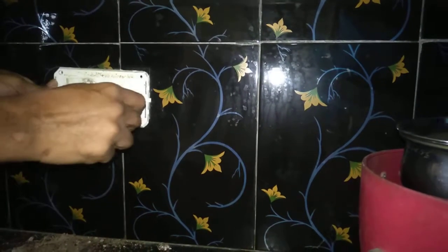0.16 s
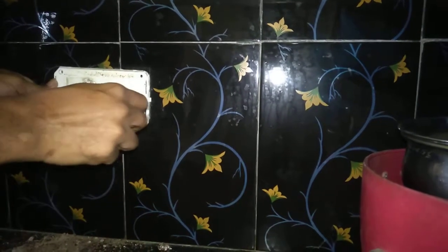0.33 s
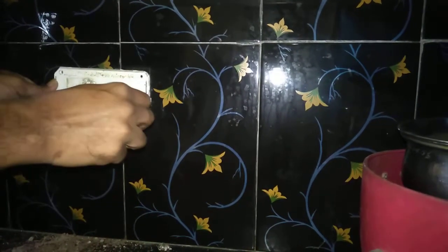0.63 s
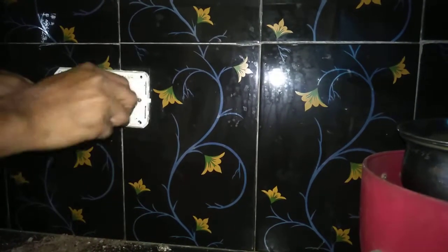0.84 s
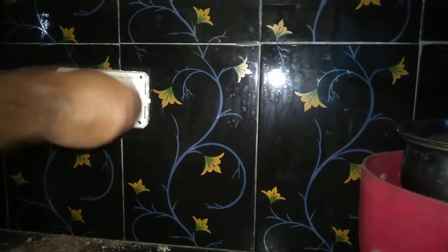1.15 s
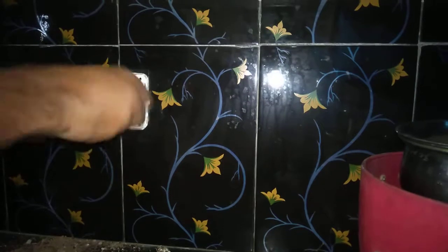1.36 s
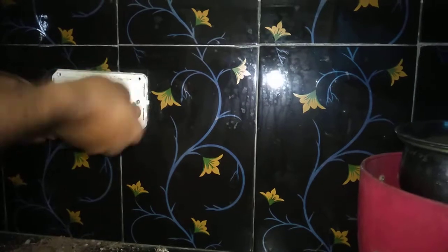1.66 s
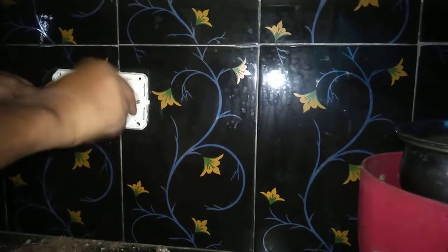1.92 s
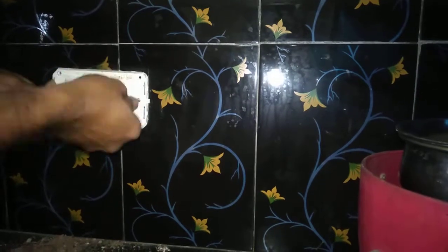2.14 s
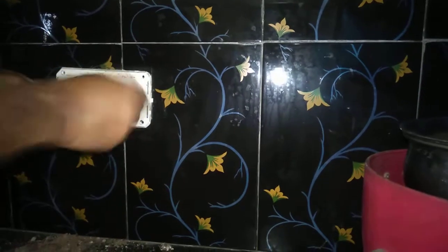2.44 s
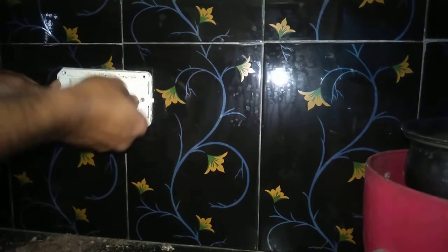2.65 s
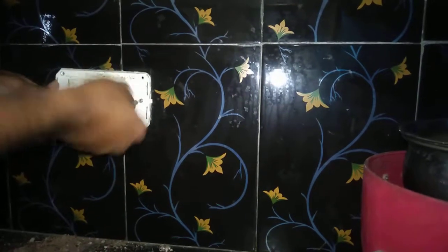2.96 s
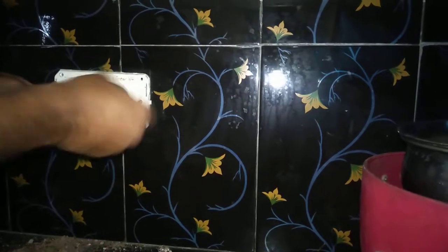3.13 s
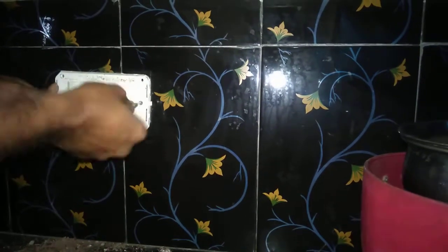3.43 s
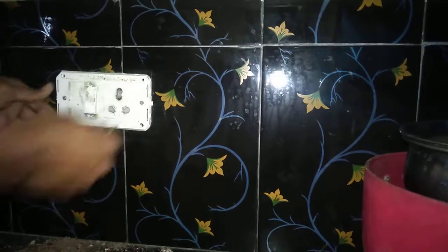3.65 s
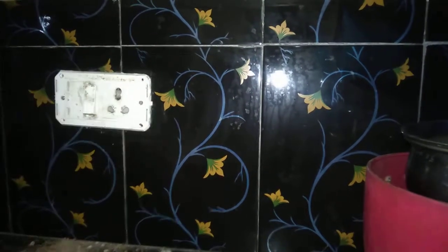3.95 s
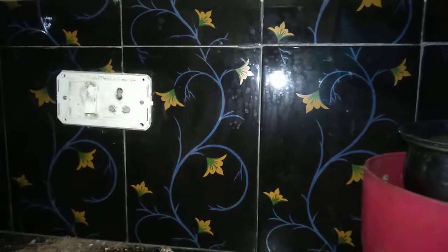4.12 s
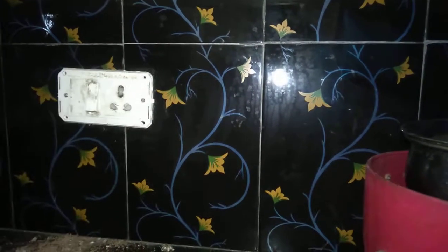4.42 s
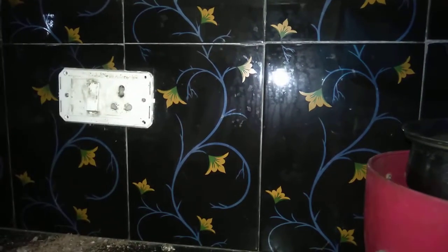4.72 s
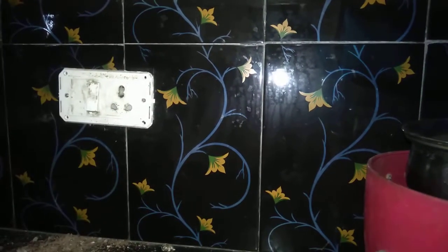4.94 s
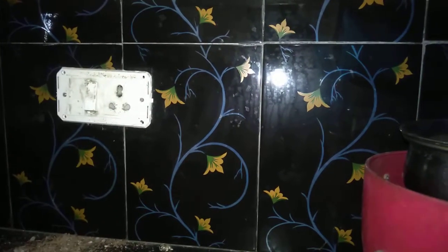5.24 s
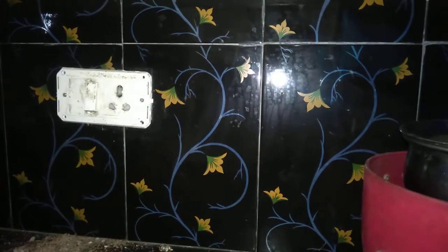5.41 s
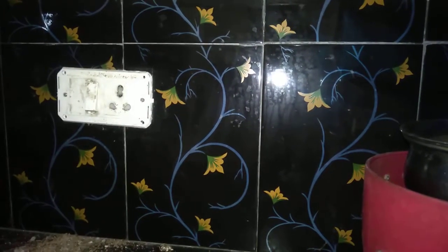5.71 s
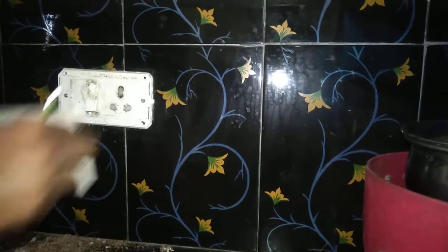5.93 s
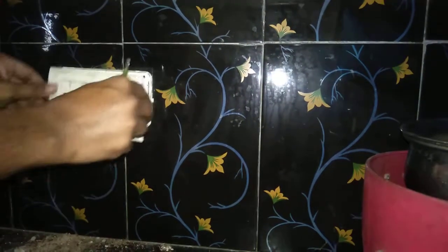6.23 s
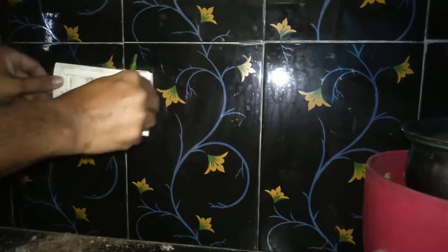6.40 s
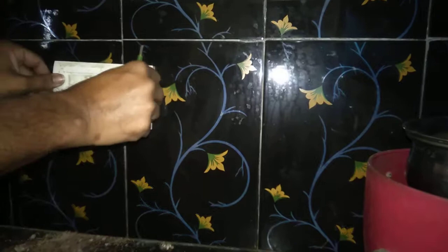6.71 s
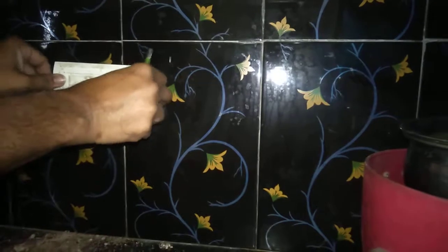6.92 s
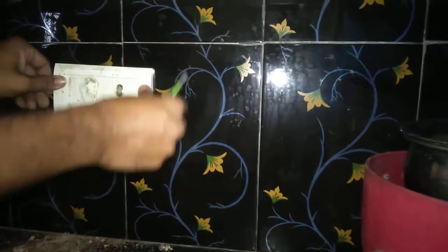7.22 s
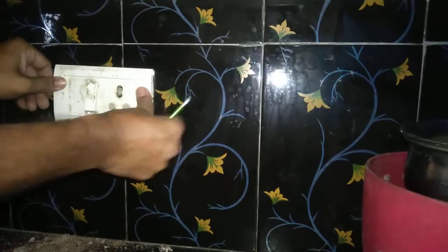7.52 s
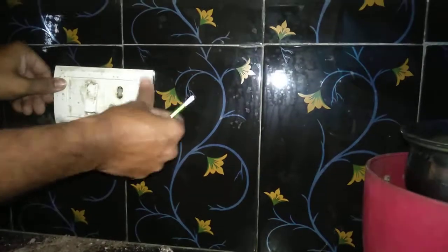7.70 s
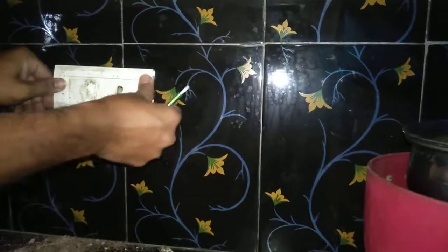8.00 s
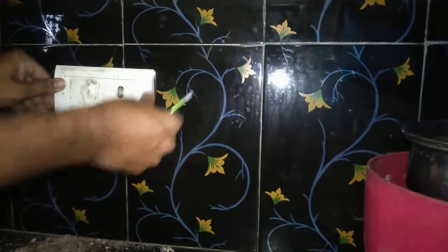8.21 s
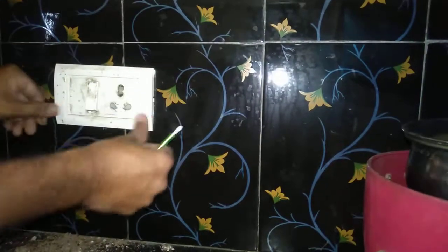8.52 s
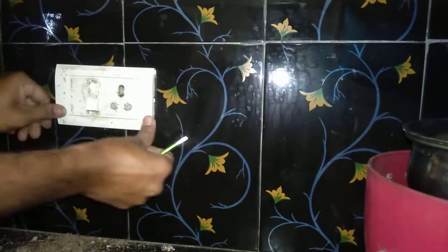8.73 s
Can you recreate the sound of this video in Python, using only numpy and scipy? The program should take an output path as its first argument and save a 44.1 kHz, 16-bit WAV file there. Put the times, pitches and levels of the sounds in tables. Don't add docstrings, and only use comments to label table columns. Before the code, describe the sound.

Close plastic clacks and rattles as a tool slips on a screw, then a wall-plate cover snaps and slams home in a hard tiled kitchen.

```python
import sys
import numpy as np
from scipy import signal
from scipy.fft import rfft, irfft, next_fast_len
from scipy.io import wavfile
from scipy.ndimage import uniform_filter1d

SR = 44100
rng = np.random.default_rng(int(sys.argv[2]) if len(sys.argv) > 2 else 0)


def generate_wav(sig):
    pcm = np.round(np.clip(np.atleast_2d(sig).T, -1, 1) * 32767).astype(np.int16)
    wavfile.write(sys.argv[1], SR, pcm)


def amplitude_ratio(level_db):
    exponent = np.asarray(level_db, float) / 20
    return 10 ** exponent


N = 390725


def evened(x):
    return x / np.sqrt(np.mean(x ** 2) + 1e-20)


def smoothed_noise(size, passes=1):
    x = rng.standard_normal(N)
    for _ in range(passes):
        x = uniform_filter1d(x, size)
    return evened(x)


def read_spectrum(points, hz):
    f, value = np.transpose(points)
    return np.interp(np.log(hz + 1), np.log(f + 1), value)


def add(mix, start_s, sound):
    part = mix[round(start_s * SR):][:len(sound)]
    part += sound[:len(part)]


def coloured_noise(points):
    size = next_fast_len(N)
    gain = amplitude_ratio(read_spectrum(points, np.fft.rfftfreq(size, 1 / SR)))
    return evened(irfft(rfft(rng.standard_normal(size)) * gain, size)[:N])


def causal(points, size=4096):
    hz = abs(np.fft.fftfreq(size, 1 / SR))
    log_gain = np.log(amplitude_ratio(read_spectrum(points, hz)))
    return np.fft.ifft(np.exp(np.conj(signal.hilbert(log_gain)))).real[:size // 2]


def resonant_noise(hz, width_hz):
    turn = np.exp(2j * np.pi * hz * np.arange(N) / SR)
    r = np.exp(-np.pi * width_hz / SR)
    slow = rng.standard_normal(N) / turn
    for _ in range(2):
        slow = signal.lfilter([1 - r], [1, -r], slow)
    return evened((turn * slow).real)


# f/Hz, level/dB per Hz
HISS_SPECTRUM = [(15, -6), (60, -16), (114, -13.5), (150, -10), (175, -26), (250, -33.5), (320, -30.5),
                 (700, -32.5), (2200, -36.5), (2800, -41.5), (11000, -43), (15700, -39), (15950, -66)]


def microphone_hiss():
    return amplitude_ratio(-63.5) * coloured_noise(HISS_SPECTRUM)


HUM_HZ, HUM_REST_DB = 142.6, -70.5
SWELL_DROP_DB, BOOM_RISE_S = -17, 0.0081
# t/s, peak level/dB, half length/s
SWELLS = [(0.16, -63, 0.17), (0.423, -62, 0.046), (0.775, -57.5, 0.12), (1, -61.5, .06), (1.526, -57, .1),
          (1.754, -61.5, 0.071), (2.194, -59, 0.058), (2.434, -60.5, 0.084), (2.64, -64.5, 0.043),
          (2.968, -59, .12), (3.266, -60, 0.16), (3.704, -59, 0.17), (4.008, -68, 0.089),
          (4.25, -66.5, 0.18), (4.754, -54.5, 0.13), (5.064, -73, 0.11), (6.21, -65, 0.17),
          (6.75, -67, 0.13), (7.5, -69, 0.44), (8.363, -59.5, 0.11), (8.703, -62.5, 0.15)]
# t/s, level/dB, t60/s
BOOMS = [
    (5.361, -37.5, 0.49),
    (5.62, -41, 0.56),
]
# f/Hz, width/Hz, level/dB
AIR_MODES = [(95.6, 15, -70.5), (297.5, 18, -82)]
# t/s, level/dB
RUMBLE = [(0.0, -71), (1.4, -71), (2.22, -61), (3.23, -70), (3.55, -66), (3.85, -75), (4.22, -71.5),
          (6.12, -77.5), (6.81, -69), (7.2, -79), (8.12, -57.5), (8.31, -60.5), (8.86, -61.5)]


def hum():
    t = np.arange(N) / SR
    pitch_hz = HUM_HZ + 3.43 * smoothed_noise(4000, passes=2)
    tone = np.sqrt(2) * np.sin(2 * np.pi * np.cumsum(pitch_hz) / SR)
    slow = t[::64]
    level = np.zeros(len(slow))
    for s, db, half_s in SWELLS:
        level += amplitude_ratio(db + SWELL_DROP_DB * ((slow - s) / half_s) ** 2)
    for s, db, t60 in BOOMS:
        since = np.maximum(slow - s, 0)
        level += amplitude_ratio(db - 60 * since / t60) * (1 - np.exp(-since / BOOM_RISE_S)) ** 2
    rest = amplitude_ratio(HUM_REST_DB) * resonant_noise(HUM_HZ, 5.2)
    modes = sum(amplitude_ratio(db) * resonant_noise(hz, width_hz) for hz, width_hz, db in AIR_MODES)
    rumble = amplitude_ratio(np.interp(t, *np.transpose(RUMBLE)) - 0.5) * resonant_noise(41, 22)
    return np.interp(t, slow, level) * tone + rest + modes + rumble


# f/Hz, t60/s
ROOM_T60 = [(150, 1), (500, 0.9), (1500, 0.57), (4000, 0.49), (7000, 0.39), (12000, 0.3), (16000, 0.37)]


def room(x):
    taps = np.zeros((2, SR))
    slots = np.arange(200, SR - 20, 20)
    shape = (2, len(slots))
    np.put_along_axis(taps, slots + rng.integers(0, 20, shape), rng.choice([-1., 1.], shape), 1)
    hz, t, z = signal.stft(taps, SR, nperseg=256)
    decay = amplitude_ratio(-60 * t / read_spectrum(ROOM_T60, hz)[:, None])
    tails = signal.istft(z * decay, SR, nperseg=256)[1]
    a, b = signal.fftconvolve(x[None], tails / np.linalg.norm(tails[0]), axes=1)[:, :N]
    shuffle_hz = 35 * smoothed_noise(300)
    turn = 2 * np.pi * np.cumsum(shuffle_hz) / SR
    return amplitude_ratio(-14) * (a * np.cos(turn) + b * np.sin(turn))


SQUEAK_HZ, SQUEAK_DB = 2706, -21
SCREW_UNTIL_S = 1.8
RUB_ENDS_DB = -25
# start t/s, firmest t/s, end t/s, hiss level/dB, body level/dB
RUBS = [(1.08, 1.14, 1.16, -68, -69), (1.522, 1.618, 1.697, -61.5, -61.5), (1.956, 2.043, 2.19, -64, -65),
        (2.42, 2.48, 2.59, -62.5, -60.5), (2.848, 2.913, 2.99, -60.5, -63),
        (3.263, 3.314, 3.39, -67.5, -66.5), (4.21, 4.245, 4.32, -56.5, -66), (4.414, 4.62, 4.76, -74, -73),
        (5.146, 5.181, 5.21, -62.5, -69.5), (5.2, 5.25, 5.31, -60.5, -68.5),
        (5.595, 5.607, 5.93, -55.5, -64), (6.7, 6.78, 6.88, -84, -66.5), (2.132, 2.128, 2.22, -88, -69.5),
        (1.09, 1.195, 1.201, -67, -68)]
# f/Hz, level/dB per Hz
SKIN_HISS = [(2060, -44.5), (3500, -10.5), (4510, -15), (5920, -1.5), (8080, -15.5), (10800, -20.5),
             (12800, -19), (15200, -5), (16200, -8), (16500, -30)]
# f/Hz, level/dB per Hz
SKIN_BODY = [(300, -20), (700, -3.5), (1500, 1.5), (2500, 2), (3500, -5.5), (5000, -31)]


def rubs():
    t = np.arange(N) / SR
    hiss_gain, body_gain = np.zeros((2, N))
    for start, firmest, end, hiss_db, body_db in RUBS:
        on = slice(round(start * SR), round(end * SR))
        slack = np.interp(t[on], np.sort([start, firmest, end]), [1, 0, 1])
        press = amplitude_ratio(RUB_ENDS_DB * slack ** 1.8)
        hiss_gain[on] += amplitude_ratio(hiss_db) * press
        body_gain[on] += amplitude_ratio(body_db) * press
    catch = smoothed_noise(500, passes=2)
    slips = amplitude_ratio(2.45 * smoothed_noise(160) - 1.5) * amplitude_ratio(1.5 * catch)
    squeak = resonant_noise(SQUEAK_HZ, 150) * (t < SCREW_UNTIL_S) * amplitude_ratio(5 * catch - 4)
    hiss = amplitude_ratio(1.0) * hiss_gain * coloured_noise(SKIN_HISS)
    body = amplitude_ratio(-2.5) * body_gain * coloured_noise(SKIN_BODY)
    return slips * (hiss + body + amplitude_ratio(21.0 + SQUEAK_DB) * body_gain * squeak)


# t/s, peak level/dB
PUSHES = [
    (5.622, -48),
    (6.892, -52),
    (6.9085, -33.5),
    (7.127, -51),
]


def pushes():
    out, t = np.zeros(N), np.arange(SR // 2) / SR
    step = (1 - np.exp(-t / .002)) ** 2 * (1 - t / .047) * np.exp(-t / .047)
    for s, db in PUSHES:
        add(out, s, amplitude_ratio(db) * step)
    return out


# t/s, peak level/dB, f/Hz, t60/s
RINGS = [(.3195, -55.5, 1310, 0.29), (.3195, -48, 1820, 0.12), (.3195, -52.5, 2720, 0.11),
         (.427, -58.5, 750, 0.14), (.656, -54.5, 635, 0.33), (.658, -48.5, 750, 0.23),
         (1.585, -61, 397, 0.21), (2.393, -49, 1310, 0.72), (2.393, -54, 1520, 0.41),
         (2.800, -59.5, 1487, 0.21), (3.445, -50.5, 472, 0.11), (3.445, -48, 732, 0.24),
         (3.467, -52, 1410, 0.26), (6.392, -48, 770, 0.099), (6.426, -51, 750, .18),
         (6.558, -50, 774, 0.29), (6.558, -50, 445, .2), (6.558, -46, 1540, 0.075), (6.667, -44, 471, .1),
         (6.690, -38.5, 754, 0.14), (6.884, -36.5, 380, 0.093), (6.910, -45.5, 714, 0.35),
         (7.127, -60, 214, .18), (7.127, -49.5, 665, 0.39), (8.566, -53, 213, 0.12),
         (1.833, -57.5, 1100, 0.44), (7.429, -51.5, 944, 0.22), (7.605, -54, 706, 0.28),
         (7.867, -51, 716, 0.25)]


def rings():
    out, t = np.zeros(N), np.arange(SR // 2) / SR
    for s, db, hz, t60 in RINGS:
        shift, turn = rng.random((2, 12, 1))
        mode_hz = hz * (1 + hz / 6000 * (shift - .5))
        cluster = np.sin(2 * np.pi * (mode_hz * t + turn)).sum(0) / np.sqrt(8)
        add(out, s, amplitude_ratio(db - 60 * t / t60) * (1 - np.exp(-t / 0.0017)) * cluster)
    return out


FIRST_DB, FIRST_S = 2, .003


def rattle(t60, rise_s):
    sign, size = rng.standard_normal((2, 5000))
    t = np.arange(5000) / SR
    fall_db = FIRST_DB * np.exp(-t / FIRST_S) - 60 * t / t60
    return sign * amplitude_ratio(2.0 * size + fall_db) * np.minimum(t / rise_s, 1) ** 2


def struck(drive, body, db):
    sound = signal.fftconvolve(drive, body)
    return amplitude_ratio(db) * sound / np.linalg.norm(sound) * np.sqrt(600)


BARE_UNTIL_S = 3.6
# f/Hz, width/Hz, lift level/dB
BARE_MODES = [(750, 140, 4), (1460, 260, 9), (2740, 200, 10.5), (3360, 180, 8.5)]


def plate(hz, octaves, bare):
    steps = np.linspace(-4, 4, 129)
    f = hz * 2 ** (steps * octaves)
    lift_db = sum(db / (1 + (2 * (f - mode_hz) / width) ** 2) for mode_hz, width, db in BARE_MODES)
    return causal(np.c_[f, -9.0 * abs(steps) ** 1.3 + bare * lift_db])


# plate width/octaves, share of panel ring in the box, t60/s, rise/s
TICK, KNOCK, CLACK = (0.75, .4, 0.088, .0014), (0.72, 0.78, 0.056, 0.00061), (0.64, 0.44, 0.051, 0.0018)
SEAT, SNAP_IN = (0.8, 0.43, .048, 0.0014), (0.66, 0.69, 0.042, 0.0011)
PRESS, CRACK = (0.73, 0.025, 0.039, .0018), (0.86, 0.76, 0.027, 0.0012)
SLAM = (1.05, 0.65, 0.051, 0.0034)
TICK_HZ, TICK_BOX_DB = 2150, -6.5
# edge level/dB, plate level/dB
TICKS = [(1.08, -80.5, 11, 13.5), (1.322, -70, -6, 1.5), (1.47, -68, -3, 3.5), (1.583, -71, -16, 3),
         (1.776, -70.5, -2, 6), (1.808, -66.5, 7, -3), (1.936, -70, -10, 7.5), (2.349, -69.5, -17, 0),
         (2.784, -71.5, -12, 2), (3.082, -73, 2, 3.5), (4.188, -59.5, -2, 2), (4.461, -68.5, 0, -4),
         (5.008, -66.5, -13, -1.5), (6.26, -69, -1, 3), (6.51, -75, 10, 5), (6.846, -60, -13, -6.5),
         (7.572, -86, 21, -6), (8.32, -63, -13, -4.5), (8.549, -64, -16.5, -24.5)]
# t/s, snap level/dB, plate level/dB over snap, plate f/Hz, box level/dB over snap
KNOCKS = [(0.317, -70, 13, 2080, 4), (0.322, -60.5, 6.5, 2120, -10), (0.425, -66, 13, 1500, -3),
          (1.113, -60.5, 3.5, 1800, 0), (2.391, -55, 17, 1440, 9.5), (2.799, -71, 11.5, 1590, 4),
          (3.302, -64.5, 5, 1540, -1.5), (3.443, -49.5, 11.5, 1690, -2.5), (3.466, -58, 15.5, 1610, 5),
          (3.551, -60, 1, 1360, -20), (5.376, -37.5, 2, 1956, -4.5), (1.831, -44, -1.5, 1760, -4.5)]
BOUNCES = [
    (3.255, -77.5, 10, 1600, -5),
    (3.455, -62, 9.8, 2100, -1),
    (3.485, -61, 6, 2200, -8),
    (.311, -74, 11, 1500, -8),
    (.650, -53, 3, 2400, -12),
]
CLACKS = [
    (0.6535, -39.5, 4.6, 1660, -15.5),
    (5.3597, -35.5, 10.3, 1647, -5),
]
SEATING = [
    (6.38, -57, 4, 2010, 1.5),
    (6.391, -50, -1.5, 2240, -12.5),
    (6.424, -62, 5, 2000, 1.5),
    (6.547, -65, -4, 1980, 2.5),
    (6.557, -49.5, -2, 2000, -3),
    (6.638, -53.5, 6.5, 2660, 6),
    (6.667, -41.5, -2, 2500, -5),
    (6.688, -48.5, 2.5, 2000, 5),
    (6.774, -82.5, 23.5, 850, 21.5),
]
SNAPS = [
    (4.201, -40.5, 4, 2560, -29),
    (6.908, -27.5, -5, 2400, -20),
    (7.859, -50, 1.5, 1370, -4),
    (7.865, -42.5, -2, 2200, -5),
    (8.554, -58, -5, 1550, 6),
]
PRESSES = [
    (6.882, -49, 1, 1100, 7.5),
    (7.42, -52.5, -1.5, 1900, 0),
    (7.427, -42, 2, 1930, -6.5),
    (8.039, -73.5, 15, 1885, 18.5),
    (8.561, -49.5, 12.5, 2760, -13),
    (8.801, -78, 14.5, 1100, 19),
]
CRACKS = [
    (4.209, -47, 8, 3070, -19),
    (6.887, -36, -14, 3180, 0.5),
    (6.8935, -26, -0.5, 1488, -24.5),
]
SLAMS = [
    (5.6186, -26, -5, 1528, -11),
    (7.1245, -27.5, -2, 2645, -18),
    (7.603, -36, -5, 2830, -18.5),
    (8.5654, -37, -2.5, 2060, -8.5),
]


def contacts():
    rows = [(s, db, edge, pl, TICK_HZ, pl + TICK_BOX_DB, *TICK) for s, db, edge, pl in TICKS]
    # (events, edge dB over snap, kind)
    kinds = ((KNOCKS, -7, KNOCK), (BOUNCES, -7, TICK), (CLACKS, -1, CLACK), (SEATING, -8, SEAT),
             (SNAPS, -12, SNAP_IN), (PRESSES, -10.5, PRESS), (CRACKS, -9, CRACK), (SLAMS, -6, SLAM))
    for events, edge, kind in kinds:
        rows += [(s, db, edge, pl, hz, box, *kind) for s, db, pl, hz, box in events]
    return rows


# f/Hz, level/dB
SNAP = [(2500, -36.5), (3800, -13), (5000, -8.5), (6300, 1), (7300, -9.5), (9000, -22), (11000, -31.5),
        (13000, -39.5)]
# f/Hz, level/dB
EDGE = [(7000, -53.5), (10000, -15), (12500, -16), (14300, -7), (15500, -2), (16200, -18.5), (16900, -47)]
# f/Hz, level/dB
BOX_CAVITY = [(110, -24.5), (200, -14.5), (340, -1.5), (430, 2.5), (560, -3.5), (900, -14), (2000, -40.5)]
# f/Hz, level/dB
BOX_PANEL = [(200, -39), (450, -13), (660, -3.5), (745, -0.5), (850, -6.5), (1100, -9.5), (2200, -63.5)]


def hits():
    out = np.zeros(N)
    snap, edge = causal(SNAP), causal(EDGE)
    cavity, panel = evened(causal(BOX_CAVITY)), evened(causal(BOX_PANEL))
    for s, db, edge_db, plate_db, plate_hz, box_db, octaves, share, t60, rise_s in contacts():
        sharp, dull = rattle(t60, rise_s), rattle(1.82 * t60, 0.81 * rise_s)
        box = np.sqrt(share) * panel + np.sqrt(1 - share) * cavity
        add(out, s, struck(sharp, snap, db - 0.5))
        add(out, s, struck(sharp, edge, db + edge_db - 0.5))
        add(out, s, struck(dull, plate(plate_hz, octaves, s < BARE_UNTIL_S), db + plate_db - 2.0))
        add(out, s, struck(dull, box, db + box_db))
    return out


def scene():
    blows, strokes = hits(), rubs()
    soft = strokes + room(blows + strokes)
    soft = signal.oaconvolve(soft, signal.firwin(301, 15900, fs=SR), "same")
    return (microphone_hiss() + hum() + soft + pushes() + rings() + blows)[None]


def top_cut(x):
    return signal.sosfilt(signal.butter(12, 17150, fs=SR, output="sos"), x)


def record(dry):
    return top_cut(dry)


dry = scene()
out = record(dry)
generate_wav(out)
```